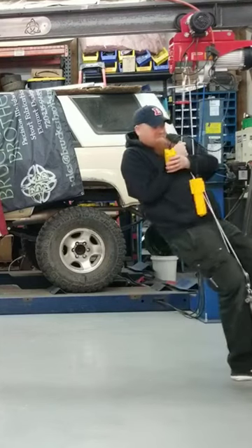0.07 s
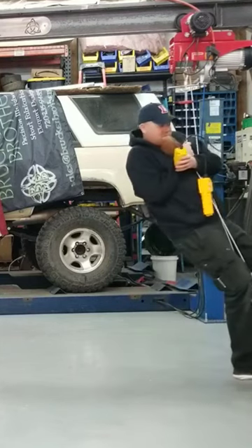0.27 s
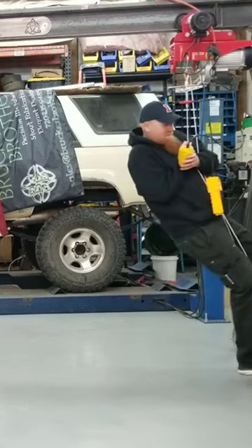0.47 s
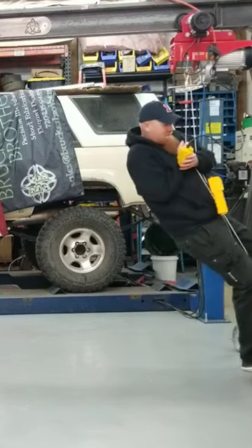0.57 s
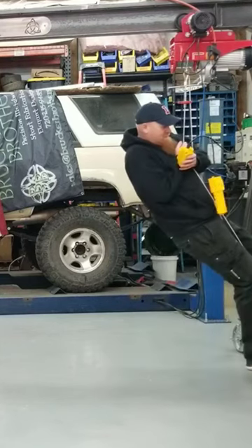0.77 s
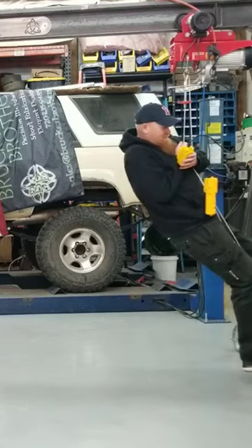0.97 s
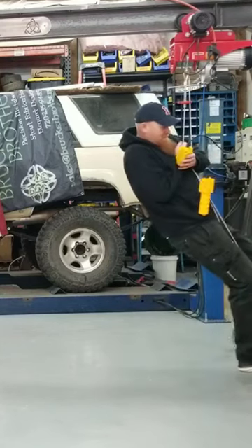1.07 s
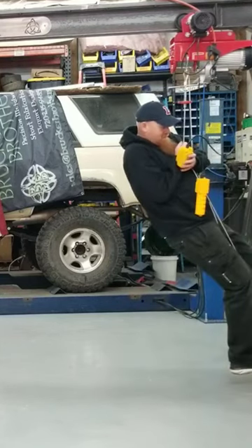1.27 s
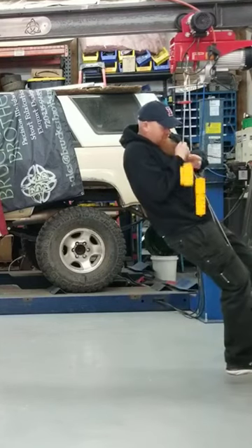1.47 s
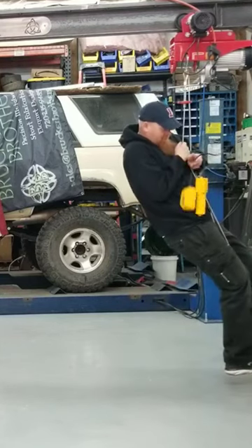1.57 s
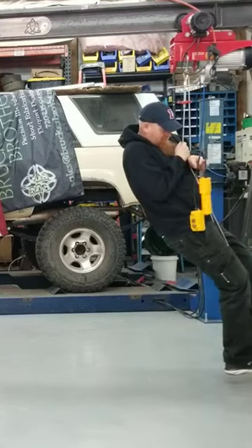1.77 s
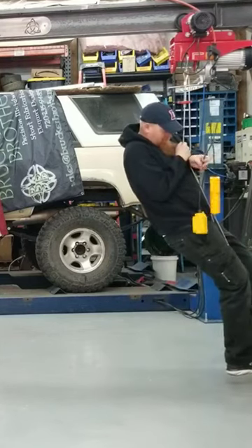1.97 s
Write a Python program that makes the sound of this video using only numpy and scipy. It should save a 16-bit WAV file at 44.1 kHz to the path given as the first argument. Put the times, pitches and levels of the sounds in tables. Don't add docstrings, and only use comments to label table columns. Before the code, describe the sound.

Loud clunk of a hoist brake, brief gear whirr, more metallic clacks, then a faint plastic knock

```python
import sys
import numpy as np
from scipy import signal
from scipy.fft import rfft, irfft
from scipy.io import wavfile
from scipy.ndimage import uniform_filter1d, map_coordinates

SR = 44100
rng = np.random.default_rng(int(sys.argv[2]) if len(sys.argv) > 2 else 0)


def to_wav(s):
    ch = np.atleast_2d(s).T
    pcm = np.round(np.clip(ch, -1, 1) * 32767)
    wavfile.write(sys.argv[1], SR, pcm.astype(np.int16))


def makeup_ratio(level_db):
    decades = np.asarray(level_db, float) / 20
    return 10 ** decades


N = 88200
MODE_SCATTER_DB = 2


def on_log(table, hz):
    table = np.array(table)
    return np.interp(np.log(hz + 1), np.log(table[:, 0]), table[:, 1])


def colour(x, table, share=1):
    n = x.shape[-1]
    hz = np.arange(n // 2 + 1) * SR / n
    return irfft(rfft(x) * makeup_ratio(share * on_log(table, hz)), n)


def unit(x):
    return x / np.sqrt(np.sum(x ** 2))


def add(out, at_s, x):
    i = int(at_s * SR)
    out[i:i + len(x)] += x[:N - i]


def decay(t, t60_s):
    return np.exp(-np.log(1000) * t / t60_s)


def ring(modes):
    detune, longest_ring_s = 0.012, 0.04
    t = np.arange(SR // 4) / SR
    out = np.zeros(len(t))
    for hz, db, t60_s in modes:
        for level, shift, sign in rng.standard_normal((3, 3)):
            tone = np.sin(2 * np.pi * hz * (1 + detune * shift) * t) * np.sign(sign)
            out += makeup_ratio(db + MODE_SCATTER_DB * level) * decay(t, min(t60_s, longest_ring_s)) * tone
    return unit(out)


def crack(table):
    x = np.zeros(1024)
    x[64] = 1
    return unit(colour(x, table))


def contacts(rate_hz, scatter_db, size):
    hits = rng.random(size) < rate_hz / SR
    x = hits * makeup_ratio(scatter_db * rng.standard_normal(size)) * np.sign(rng.standard_normal(size))
    x[0] = makeup_ratio(scatter_db)
    return unit(x) * np.sqrt(size)


def chatter(shape):
    size = len(shape)
    tones = rfft(contacts(5000, 4, size) * shape)
    power = uniform_filter1d(abs(tones) ** 2, size=size // 400)
    x = irfft(tones / np.sqrt(power + 1e-9))
    return unit(x * shape ** 0.25)


# start in seconds, housing, rail and crack levels in dB, chatter length in seconds.
CLACKS = [
    (0.2417, -45.5, -56, -72, 0.0019),
    (0.2464, -18, -33, -24, 0.025),
    (0.605, -25, -25, -37.5, .018),
    (0.7827, -47.5, -46, -69.5, 0.0067),
    (0.9549, -21, -27.5, -37.5, .016),
    (1.051, -37, -33.5, -49.5, 0.0045),
    (1.0582, -25.5, -23.5, -50.5, 0.0081),
]
# frequency in Hz, level in dB, T60 in seconds.
HOUSING = [(2350, -15.5, 0.13), (2690, -10, .05), (2827, 3, 0.24), (2900, 8, 0.027), (2995, 8.5, 0.16),
           (3192, 7, .08), (3300, 4.5, 0.033), (3335, 1, 0.033), (3410, -1, 0.1), (4095, -19, 0.067),
           (4616, -24.5, 0.017), (7456, -19, 0.046)]
RAIL = [(335, -5.5, 0.027), (429, -9, 0.045), (521, 1, 0.14), (637.5, -1.5, .1), (644, 6.5, 0.033),
        (781, -20.5, 0.24), (920, 2, 0.027), (1040, 0.5, 0.072), (1234, -6, 0.16), (1297, 7.5, 0.028),
        (1402, -0.5, 0.063), (1545, -3.5, 0.065), (1723, -0.5, .05)]
# frequency in Hz, level in dB.
CRACK = [(2500, -45.5), (4000, 9), (5500, 8.5), (7200, 12.5), (9000, -4), (12000, 2.5), (15000, 8.5)]
COVERS = [(200, -37), (450, -17), (900, -19.5), (1600, 9), (2100, 7), (3100, 7), (4500, -3.5), (7000, -47)]


def clacks():
    first_blow, first_blow_s, rise_s, covers_db = 1.5, 0.003, 0.0006, 2
    out, t = np.zeros(N), np.arange(2048) / SR
    first = 1 + first_blow * np.exp(-t / first_blow_s)
    rise = 1 - np.exp(-t / rise_s)
    for start_s, housing_db, rail_db, crack_db, length_s in CLACKS:
        push = chatter(first * np.exp(-(t / length_s) ** 4) * rise)
        body = makeup_ratio(housing_db) * ring(HOUSING) + makeup_ratio(rail_db) * ring(RAIL)
        cover_level = makeup_ratio((rail_db + housing_db) / 2 + covers_db)
        tick = makeup_ratio(crack_db) * crack(CRACK) + cover_level * crack(COVERS)
        body[:960] += tick[64:]
        add(out, start_s, 30 * signal.fftconvolve(push, body))
    return out


# time in seconds, level in dB.
EFFORT = [
    (0.258, -44.5),
    (0.331, -44.5),
    (0.398, -34.5),
    (0.448, -43),
    (0.522, -39),
    (.57, -39),
    (0.597, -35),
    (.612, -24.5),
]
# time in seconds, tooth mesh rate in Hz.
MESH = [
    (0.33, 202.9),
    (0.38, 226.3),
    (0.424, 294.4),
    (0.52, 312.5),
    (0.548, 362.5),
    (0.588, 381.4),
    (0.61, 397),
]
# frequency in Hz, level in dB.
GEARBOX = [(200, -31), (330, -8), (550, 10), (950, -3), (1300, -13), (2500, -44)]


def motor():
    mesh_jitter, brighten_db_per_s = 0.02, 62
    rail_db, mesh_db, housing_db, crack_db, covers_db = -3.5, -0.5, -4.5, -5.5, 2.5
    t, effort = np.arange(N) / SR, np.array(EFFORT)
    stop_s = effort[-1, 0]
    on = (t > effort[0, 0]) & (t < stop_s)
    load = on * makeup_ratio(np.interp(t, *effort.T))
    wobble = uniform_filter1d(rng.standard_normal(N), size=400) * 20
    mesh_hz = np.interp(t, *np.array(MESH).T) * (1 + mesh_jitter * wobble)
    mesh = np.diff(np.floor(np.cumsum(mesh_hz) / SR), prepend=0)
    teeth = load * contacts(3000, 4, N)
    fast = teeth * makeup_ratio(brighten_db_per_s * np.minimum(t - stop_s, 0))
    sheet = makeup_ratio(crack_db) * crack(CRACK) + makeup_ratio(covers_db) * crack(COVERS)
    grind = makeup_ratio(rail_db) * signal.fftconvolve(teeth, ring(RAIL))[:N]
    grind += makeup_ratio(mesh_db) * signal.fftconvolve(load * mesh / mesh.std(), crack(GEARBOX))[:N]
    grind += makeup_ratio(housing_db) * signal.fftconvolve(fast, ring(HOUSING))[:N]
    grind += signal.fftconvolve(fast, sheet)[:N]
    return grind + on * squeal(t)


def squeal(t):
    squeal_hz, band_hz, peak_s, width_s, level_db = 7250, 90, 0.555, 0.025, -39
    rub = signal.lfilter(*signal.iirpeak(squeal_hz, squeal_hz / band_hz, SR), rng.standard_normal(N))
    swell = 1 / (1 + ((t - peak_s) / width_s) ** 2)
    return makeup_ratio(level_db) * swell * rub / rub.std()


# start in seconds, level in dB.
SWAYS = [
    (0.964, -56),
    (1.066, -53.5),
]
# frequency in Hz, level in dB, T60 in seconds.
BEAM = [(193.8, 6, 0.31), (620, -9, 1.1), (1360, -22.5, 1.5), (2245, -9, 1.6)]


def sway():
    out, t = np.zeros(N), np.arange(SR) / SR
    notes = sum(makeup_ratio(db) * np.sin(2 * np.pi * hz * t) * decay(t, t60_s) for hz, db, t60_s in BEAM)
    for start_s, db in SWAYS:
        add(out, start_s, makeup_ratio(db) * notes)
    return out


# start in seconds, level in dB, contact length in seconds, crack level in dB.
KNOCKS = [
    (1.786, -61.5, 0.018, -2.5),
    (1.8373, -46, 0.00099, -8),
]
# frequency in Hz, level in dB, T60 in seconds.
PLASTIC = [(571, -7, 0.039), (677, -5, 0.023), (786, 0.5, 0.013), (887, -2, 0.0044), (1027, -8.5, 0.036),
           (1460, -3.5, 0.021)]


def handsets():
    out, t = np.zeros(N), np.arange(4096) / SR
    for start_s, db, length_s, crack_db in KNOCKS:
        body = ring(PLASTIC)
        body[:1024] += makeup_ratio(crack_db) * (crack(COVERS) + makeup_ratio(-1.5) * crack(CRACK))
        push = chatter(np.exp(-(t / length_s) ** 2))
        add(out, start_s, 30 * makeup_ratio(db) * signal.fftconvolve(push, body))
    return out


# frequency in Hz, T60 in seconds.
ROOM_T60 = [(150, .8), (400, 0.64), (1000, 0.63), (2700, 0.6), (7000, 0.35), (13000, 0.13)]
# frequency in Hz, correlation from -1 to 1.
ROOM_LIKENESS = [(100, 0.99), (300, 0.63), (700, 0.6), (1500, .1), (3000, -0.023), (8000, 0.52)]


def room():
    build_s, length_s = 0.004, 0.9
    t, hz = np.arange(SR) / SR, np.arange(SR // 2 + 1)
    noise, out = rfft(rng.standard_normal((2, SR))), 0
    like = np.clip(on_log(ROOM_LIKENESS, hz), -0.99, 0.99)
    mid, side = noise[0] * np.sqrt(1 + like), noise[1] * np.sqrt(1 - like)
    pair = np.array([mid + side, mid - side])
    for centre_hz in 62.5 * 2.0 ** np.arange(9):
        band = np.clip(1 - abs(np.log2((hz + 1) / centre_hz)), 0, 1)
        out = out + irfft(pair * band, SR) * decay(t, on_log(ROOM_T60, centre_hz))
    power = abs(rfft(out.sum(axis=0))) ** 2
    even = np.sqrt(uniform_filter1d(power, size=600) / uniform_filter1d(power, size=50))
    out = irfft(rfft(out) * even, SR) * (t < length_s)
    return unit(out * (1 - np.exp(-(t / build_s) ** 2))) * np.sqrt(2)


# frequency in Hz, level in dB per Hz.
AIR = [(15, -35), (25, -5.5), (60, -1.5), (151, -11), (278, -24), (425, -24), (460, -25), (1100, -37.5),
       (14000, -45)]


def air():
    level_db, swell_db, alike_below_hz, bass_side_db = -62.5, 1, 350, -15
    mid, side = colour(rng.standard_normal((2, N)), AIR)
    bass = signal.lfilter(*signal.butter(1, alike_below_hz, fs=SR), side)
    side = side - (1 - makeup_ratio(bass_side_db)) * bass
    steps = np.repeat(rng.standard_normal(N // 4096 + 1), 4096)
    swell = uniform_filter1d(steps, 4096)[:N]
    return makeup_ratio(level_db + swell_db * swell) * np.array([mid + side, mid - side]) / mid.std()


# frequency in Hz, gain in dB.
MIC = [(9500, 0.5), (10800, 1.5), (12000, 15), (13300, 0.5), (14200, -2.5)]
# frequency in Hz, left over right in dB.
PORTS = [(100, 1.5), (300, 1.5), (600, 2), (1200, 7), (2500, 7.5), (4500, 2), (8000, -5.5), (13000, -5)]
# frequency in Hz, gain in dB.
TOP = [(14250, 0), (14750, -30), (15700, -40)]


def scene():
    radiates_above_hz, left_lag_s, hoist_room_db, hand_room_db = 290, 0.000205, -2.5, 0
    small = signal.butter(4, radiates_above_hz, "high", fs=SR, output="sos")
    hoist, hand = signal.sosfilt(small, [clacks() + motor(), handsets()])
    hoist = hoist + sway()
    direct = hoist + hand
    late = map_coordinates(direct, [np.arange(N) - left_lag_s * SR], mode="nearest")
    to_room = makeup_ratio(hoist_room_db) * hoist + makeup_ratio(hand_room_db) * hand
    wet = signal.fftconvolve(to_room[None], room())[:, :N]
    left, right = colour(np.array([late, direct]) + wet, MIC)
    ports = np.array([colour(left, PORTS, share=0.5), colour(right, PORTS, share=-0.5)])
    return colour(ports + air(), TOP)


def roll_off(x):
    return signal.sosfilt(signal.butter(12, 15820, fs=SR, output="sos"), x)


def record(dry):
    return roll_off(dry)


dry = scene()
out = record(dry)
to_wav(out)
```